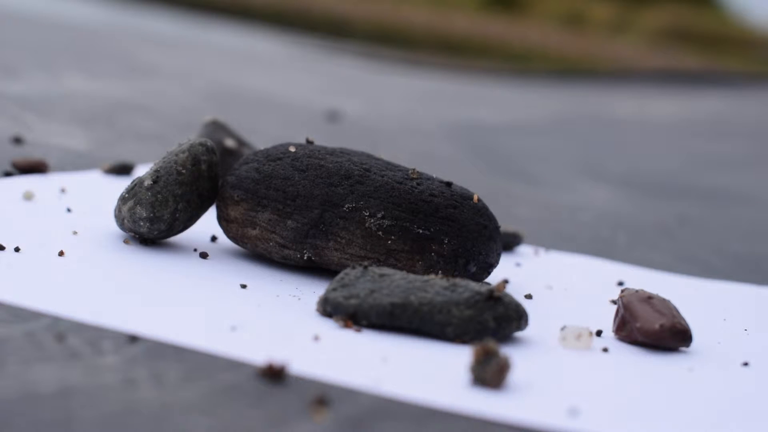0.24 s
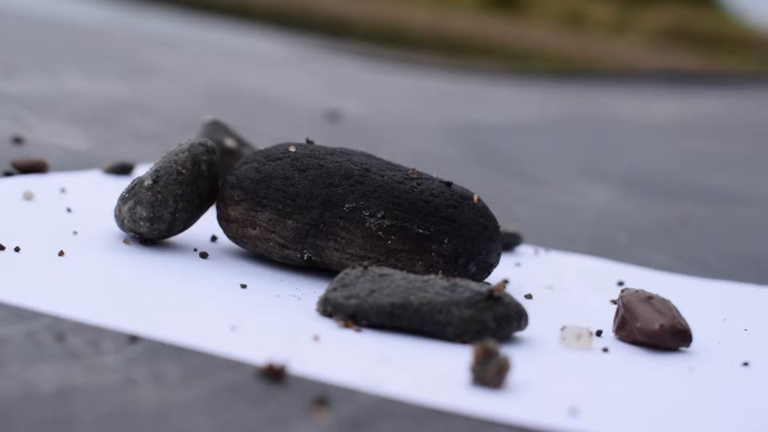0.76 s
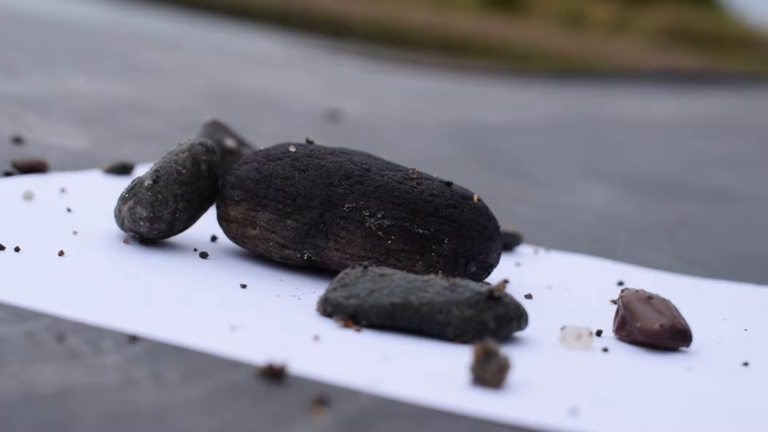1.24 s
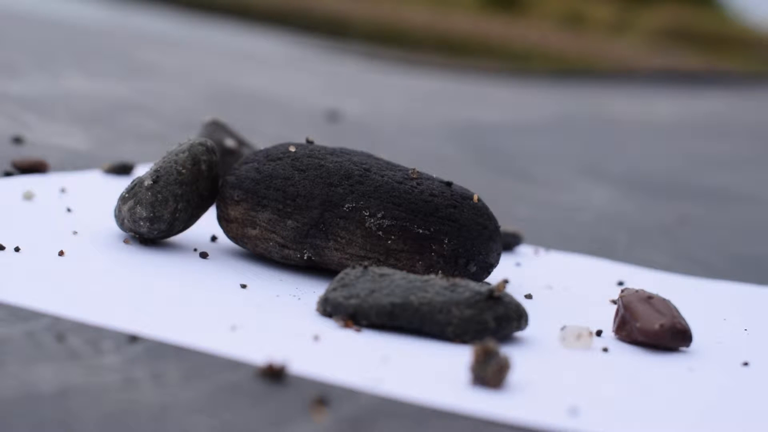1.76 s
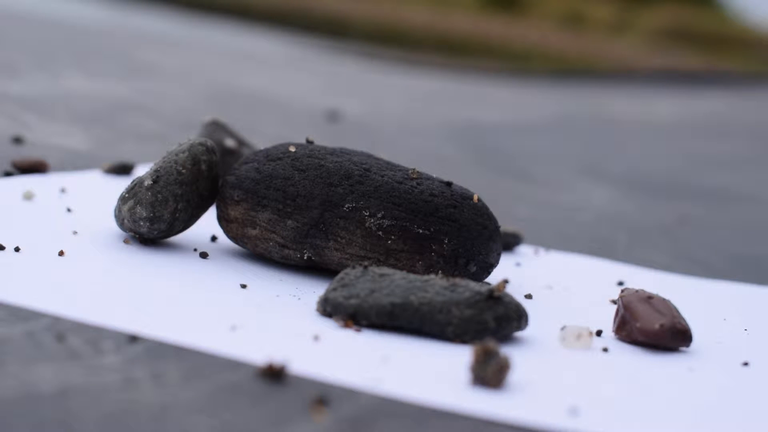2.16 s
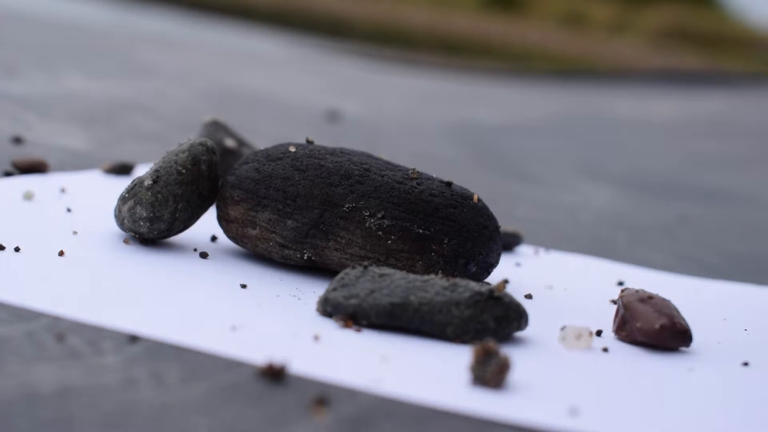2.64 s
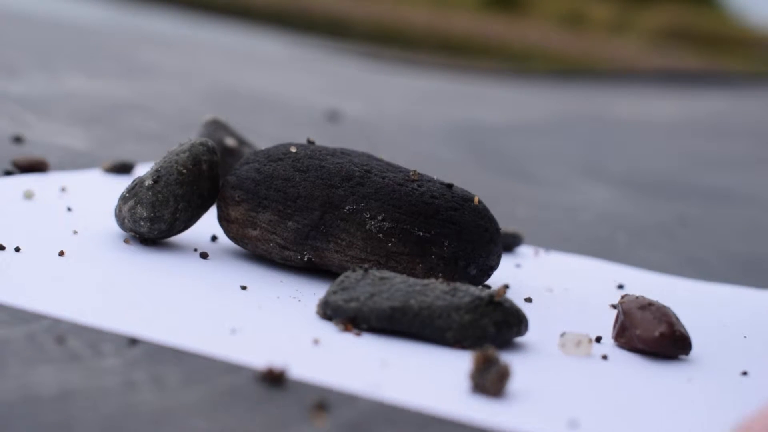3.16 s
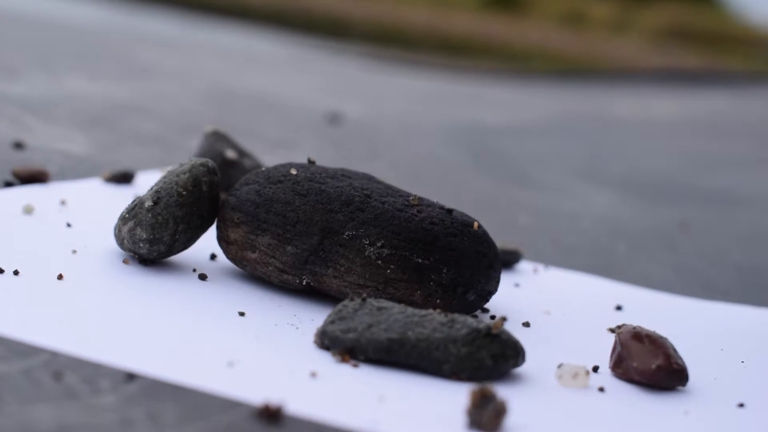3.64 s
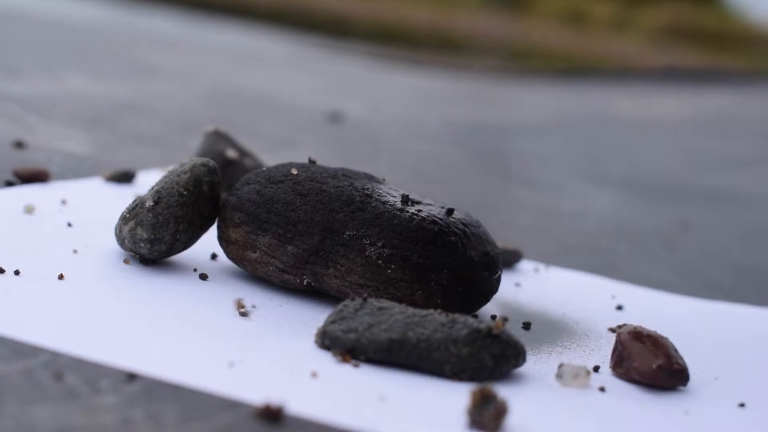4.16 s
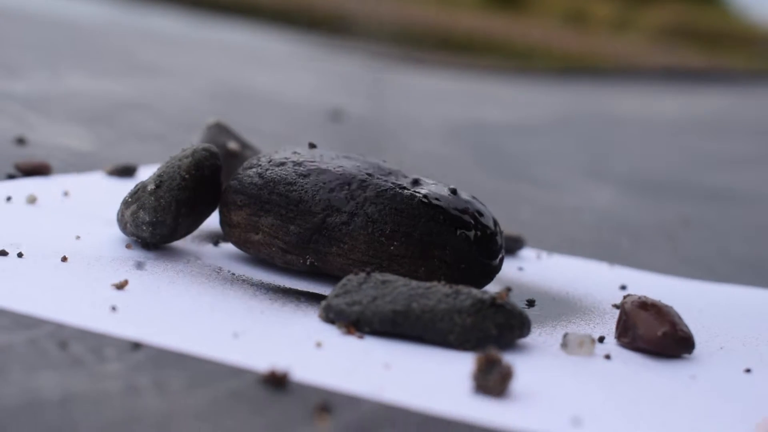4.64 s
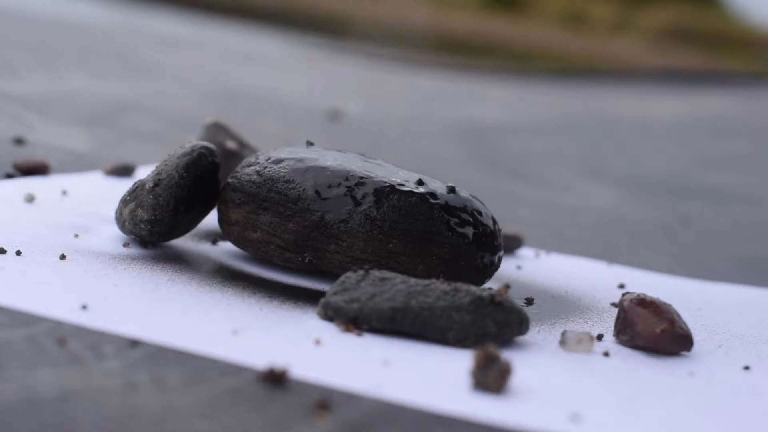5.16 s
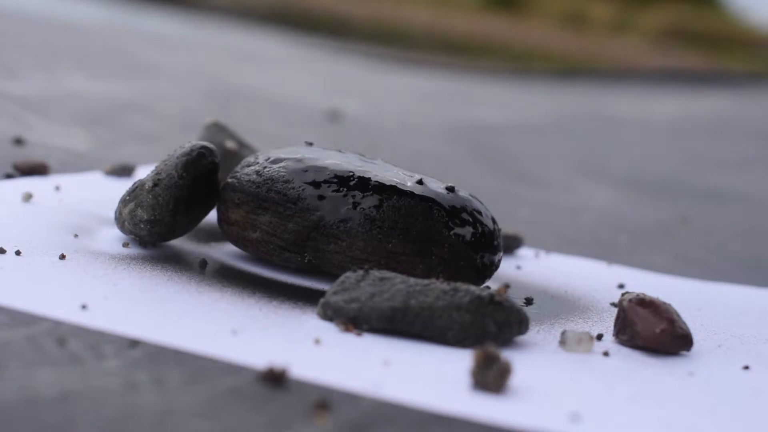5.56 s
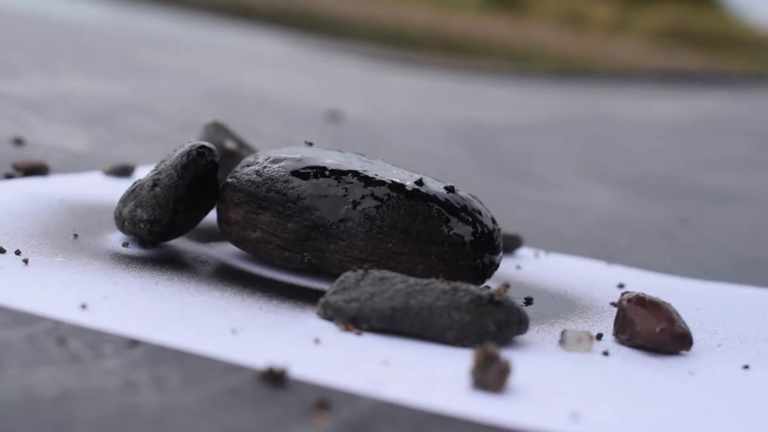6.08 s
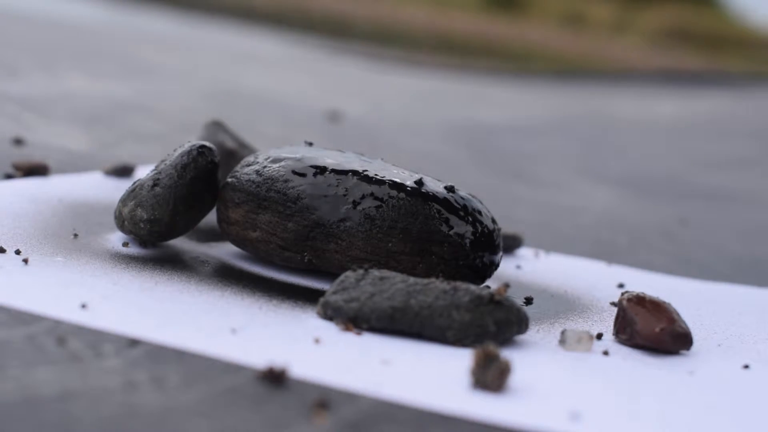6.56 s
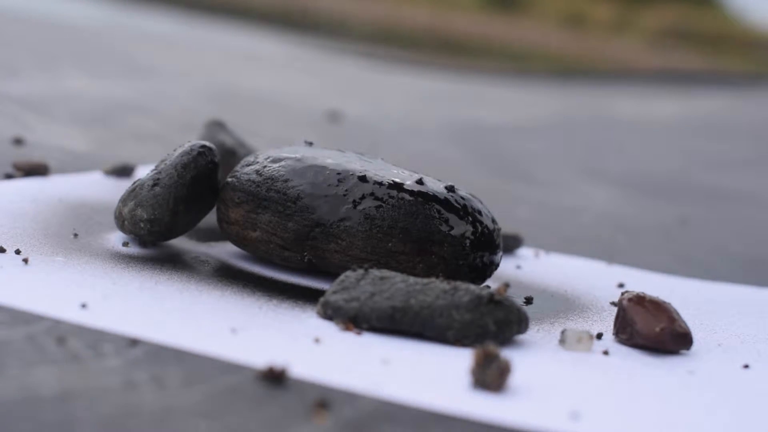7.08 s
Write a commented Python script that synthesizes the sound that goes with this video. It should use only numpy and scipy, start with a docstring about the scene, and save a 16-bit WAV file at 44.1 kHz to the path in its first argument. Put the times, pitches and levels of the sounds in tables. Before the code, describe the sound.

About twenty fast, loud clanks of a mixing ball in a metal can, alternating between brighter base hits and slightly weaker top hits, clipping the close microphone. After a last rattle comes over a second of near quiet: faint taps, a thin high whistle, soft background wash. A crisp spray hiss follows to the end, thinning and gently pulsing as the jet flicks back and forth, while the ball knocks dully in the paint. Dry open sound.

```python
"""A shaken spray paint can: impacts of the mixing ball excite decaying modes of wall and dome, each slam
followed by ever weaker rebounds and a skitter; the hard blows overload the input. After a pause the nozzle
hisses over some stones, jet noise whose spectrum follows the aim, and the ball, deep in paint, knocks more dully.
Churning paint and finger taps are shaped noise, a papery rustle is a run of tiny impacts, a thin whistle is
a gliding sine. A soft distant wash of filtered noise with a low murmur lies underneath."""
import sys
import numpy as np
from scipy import signal
from scipy.fft import rfft, irfft, next_fast_len
from scipy.io import wavfile
from scipy.ndimage import uniform_filter1d

SR = 44100
rng = np.random.default_rng(int(sys.argv[2]) if len(sys.argv) > 2 else 0)


def wav_record(signal):
    """Record a signal, one row per channel, as 16-bit PCM in the file named by sys.argv[1]."""
    frames = np.transpose(np.atleast_2d(signal))
    bounded = np.clip(frames, -1, 1)
    # unit amplitude maps onto the largest positive 16-bit level
    quanta = np.round(bounded * 32767).astype(np.int16)
    wavfile.write(sys.argv[1], SR, quanta)


N = 322371
TIME = np.arange(N) / SR
STEREO = np.array([[1], [-1]])  # sign of a difference signal at left and right

# outward strokes slam the ball into the base: start_s, peak_db, wall_hz, dome_hz, dome_db (against the wall),
# tick_db (against wall and dome), first_hop_s, chatter_gap_s, rebound_peak_db, skitter_db
OUT_STROKES = [(0.2315, 2, 1730, 3296, 3, 0.5, .0225, 0.0091, -12, -28.5),
               (0.4111, 11.5, 2185, 3297, 2, -20, .046, 0.0063, -3, -31),
               (0.6143, 12, 1910, 3093, -1, -11, 0.017, 0.015, 2, -24),
               (0.8164, 11.5, 1794, 3510, 5.5, -7, 0.013, 0.007, 6, -27),
               (1.0088, 11, 2200, 2870, 7, -1, 0.018, 0.0093, 3, -20.5),
               (1.192, 10.5, 2060, 2950, 10.5, -4, 0.014, 0.014, 2, -29),
               (1.3911, 10, 1945, 2755, -2, -3.5, .014, 0.0054, 1, -23.5),
               (1.5953, 13, 1690, 3183, 4, 1.5, .0117, 0.0098, 5.5, -26),
               (1.7693, 10, 2130, 3140, 11, -3, 0.012, 0.013, 3, -25.5),
               (1.9442, 10, 2278, 2713, 5, -3, 0.018, 0.0098, 5.5, -22),
               (2.1214, 12.5, 2276, 2767, 4.5, -6.5, 0.024, 0.015, -11.5, -55.5)]
# back strokes throw it against the top, with longer hops on the whole: start_s, peak_db, wall_hz, dome_hz,
# dome_db (against the wall), tick_db (against wall and dome), first_hop_s, chatter_gap_s, rebound_peak_db, skitter_db
BACK_STROKES = [(0.4959, 9.5, 1870, 2954, -4.5, -3, 0.055, 0.02, -14, -35),
                (0.7243, 9.1, 1860, 3430, -4.5, -1, 0.025, .0103, -1.5, -23.5),
                (0.8845, 10.2, 1940, 3315, -6.5, -9, 0.043, 0.014, -1, -47),
                (1.101, 6.3, 1567, 2810, -6.5, -6.5, 0.021, 0.011, -2, -40),
                (1.2829, 8.1, 1660, 2940, 3.5, -4, .035, .003, -2.5, -57),
                (1.4694, 7.5, 1570, 2890, -5, -10, 0.02, 0.021, -4, -30),
                (1.6653, 7.2, 1590, 2960, -10.5, -4, .0258, 0.011, -6.5, -33.5),
                (1.8362, 9.3, 1847, 2745, -4.5, -20, .024, 0.014, -0.5, -38.5),
                (2.0296, 8.6, 1577, 4750, -11.5, -10.5, 0.024, 0.013, -3.5, -47)]
# rebounds off base and top: centre of the wall pitch, loss times the bounce count squared, skitter length
BASE_WALL_HZ, BASE_LOSS_DB, BASE_SKITTER_S = 1876, 1.24, .065
TOP_WALL_HZ, TOP_LOSS_DB, TOP_SKITTER_S = 1470, 2.2, .04
# each chatter gap is about this share of the one before; a rebound is a glancing blow that stirs the dome less
GAP_SHARE, REBOUND_DOME_HZ, REBOUND_DOME_DB, REBOUND_TICK_DB = .88, 2975, -12.5, -10.5
SLIDE_S, SLIDE_DB = 0.024, -3.5  # slide along the wall just before the base; level against the skitter after
# the ball rolls along the wall, and at 4.88 s something rustles like paper:
# start_s, length_s, level_db, scrape_db (against the ring)
ROLLS_AND_RUSTLE = [(2.169, 0.091, -31, -18), (2.244, 0.1, -38, -22), (4.88, .093, -33.5, -2.5),
                    (5.659, 0.078, -40.5, -16)]
# modes of the can at rest, further damped in each sound: mode_hz, relative_db, t60_s
CAN_MODES = [(674, -19, 0.017), (1080, -0.5, 0.024), (1256, -6, 0.072), (1433, 1.5, 0.056),
             (1672, -5, 0.064), (1893, 2.5, 0.065), (2112, 0, 0.025), (2770, -20.5, 0.35),
             (2980, -15, 0.059), (3295, -11.5, 0.1), (4144, -8, 0.037), (4655, -21, 0.049),
             (5820, -21, 0.031), (6050, -20.5, 0.038), (7980, -28, 0.03), (9180, -37.5, .04),
             (11400, -30, 0.023)]
PAINT_T60_S, WET_CAN_T60_S = .07, .015  # extra damping of the can in a skitter, and in a knock under paint
# contact noise of dry steel: frequency_hz, relative_db
DRY_TICK = [(600, -19), (2500, -1.5), (4800, 1), (9500, -5), (12500, -11), (16000, -22)]
# contact noise of steel under paint: frequency_hz, relative_db
WET_TICK = [(600, -25), (1700, -9), (2600, -1.5), (3700, -6), (5200, -8), (9000, -12.5), (16000, -25)]
BEAM_DB_PER_OCTAVE = 7.5  # the higher the part of a tick, the more it differs between the ears
# steel scraping along the wall: frequency_hz, relative_db
SCRAPE = [(100, -42), (500, -35.5), (2500, -8), (4500, 10.5), (10000, 6), (13000, -12), (16000, -21.5)]
GRIT_DB = 5.5  # spread of the scrape level from spot to spot
# paint thrown up by a blow: frequency_hz, relative_db
SPLASH = [(1000, -24), (2400, 4.5), (3200, 3), (5500, -7), (7500, -8), (11000, -17), (15000, -24)]
# single knocks of the loose ball as the can turns or tilts: start_s, peak_db, wall_hz, dome_hz,
# dome_db (against the wall)
KNOCKS = [(0.2834, -8, 1950, 4520, 1), (1.268, -6, 1420, 3060, -10), (1.443, -8.5, 1830, 3070, -12),
          (2.174, -10.5, 1540, 3050, -7), (2.279, -12, 1520, 3750, -13), (2.29, -16.5, 1430, 3060, -15),
          (2.3981, -6, 2650, 2900, 0.5), (4.1156, -8, 2390, 3330, -6), (4.152, -19, 2050, 3300, -23),
          (4.6462, -10.5, 1740, 3330, 10), (5.073, -7.5, 2540, 3250, 4.5), (5.108, -11.5, 1770, 3410, 5),
          (5.4457, -4, 2440, 3140, 17), (5.4785, -13.5, 1640, 2550, -4), (5.507, -15, 1720, 3280, -17),
          (5.549, -24, 1700, 3000, -15), (5.604, -11.5, 1653, 2450, -24), (5.6278, -17, 1807, 4200, -12),
          (5.7953, -14, 1140, 3920, 6), (5.984, -10.5, 2470, 3640, 9), (6.4095, -14, 1070, 2960, 8),
          (6.4535, -19, 2060, 3100, 13), (6.5566, -13.5, 1320, 3320, 8), (6.65, -21.5, 2420, 2950, 7),
          (6.6862, -26, 2340, 3600, -3), (7.019, -16, 1100, 3130, 12), (7.0835, -13.5, 2360, 3030, -3),
          (7.1009, -13.5, 2140, 2660, -7), (7.1851, -11.5, 2210, 2610, -37), (7.214, -9.5, 2400, 3290, 16),
          (7.2819, -8, 2400, 3000, -2), (7.2932, -11.5, 2150, 4250, -6)]
KNOCK_TICK_DB, WET_TICK_DB = -14, -10.5  # contact tick of a dry knock, and of one under paint

# paint churning in the can while it is shaken, then settling: time_s, level_db
SLOSH_LEVEL = [(0, -61), (.2, -42), (.6, -39.5), (1.8, -44), (2.3, -46), (2.42, -46.5), (2.78, -53.5),
               (3.0, -87.5)]
# spectrum of the churning paint: frequency_hz, relative_db
SLOSH_COLOUR = [(200, -31), (750, -5.5), (1250, 5.5), (1900, -0.5), (2500, -3), (3300, -9.5), (6000, -14),
                (11000, -15.5), (15000, -36.5)]
CHURN_DB = 2.2  # unevenness of the churning
# fingers shift on the cap and the can: start_s, level_db (before decay), centre_hz,
# fall_db (two octaves below and one above the centre), t60_s
CAP_TICKS = [(2.51, -37, 2400, 9.5, 0.25), (3.432, -40.5, 3020, 14, .043), (3.509, -48.5, 4060, 14, 0.038),
             (3.84, -40, 7550, 12, 0.024), (5.366, -26, 1000, 43, 0.084), (6.125, -29.5, 810, 38, 0.058),
             (6.725, -31, 770, 41, 0.049)]

# the hand carries the jet from the middle of the stones to their edge: time_s, level_db, aim (0 middle, 1 edge)
JET = [(4.02, -32, 0.23), (4.2, -30, 0.31), (4.55, -31.5, 0.18), (4.8, -30.5, 0.044), (4.98, -35, .3),
       (5.35, -32.5, 0.58), (5.7, -35, 0.71), (5.98, -38.5, 0.9), (6.5, -41, .95), (6.85, -38.5, 0.78),
       (7.31, -39, 1)]
# hiss aimed at the middle, its dB scaled by 1.5 - aim: frequency_hz (before the hump moves), relative_db
HISS_MIDDLE = [(700, -31), (2100, -13), (3400, -13), (3800, -9), (4400, -9), (5250, -12.5), (5750, -12.5),
               (6800, -13.5), (8500, -9.5), (10000, -15.5), (10900, -14.5), (12100, -11), (14000, -20),
               (16000, -27)]
# hiss aimed at the edge, its dB scaled by aim: frequency_hz (before the hump moves), relative_db
HISS_EDGE = [(700, -48), (1920, -7.5), (3260, -12), (4320, -6), (5180, -5), (6200, -11), (7500, -8.5),
             (9100, -2.5), (10200, 3), (11200, -7), (12050, -7.5), (13450, -4), (16000, -7)]
MIDDLE_HZ, EDGE_HZ = 8700, 8840  # main hump of each
# narrow peaks and dips that stay put in the hiss: centre_hz, width_hz, gain_db
HISS_RIPPLE = [(2660, 300, 3), (2950, 190, 0.5), (3440, 150, 5), (5370, 180, 4.5), (5730, 290, -3.5),
               (11400, 410, -2)]
# the lower hiss, made where the jet strikes the stones, at the middle and at the edge
STRIKE_MIDDLE_DB, STRIKE_EDGE_DB = -7.5, -0.65
COMB_DEPTH = .25  # strength of the reflection off the table
# hiss scattered from all around: frequency_hz, relative_db
SCATTER = [(2500, -56), (4000, -30), (5600, -1.5), (8000, -13.5), (10500, 0), (13500, -6), (16000, -3.5)]
SCATTER_DB = -46
VALVE_OPEN_S, VALVE_RISE_S = 4.013, .06
JET_FLUTTER_DB, HAND_TREMOR_DB = .25, 1  # fast flutter, and the slower waver of the unsteady hand
# moments at which the flicked jet crosses the stones: time_s
PASSES = [5.4, 5.6, 5.8, 6.04, 6.26, 6.49, 6.73, 6.9, 7.11, 7.31]
# each pass swells the hiss and, a little earlier, lifts its pitch; the flicks widen over the first passes
PASS_SWELL_DB, PASS_BEND, PASS_LEAD_S, PASS_GROW_S = 3, 0.047, 0.04, 1

# a faint thin whistle, before its wavering: time_s, pitch_hz, level_db
WHISTLE = [(2.98, 11000, -100), (3.06, 11150, -70.5), (3.35, 10900, -72), (3.42, 9540, -71),
           (3.52, 9500, -68), (3.58, 9300, -100)]
# spectrum of the distant wash: frequency_hz, relative_db
WASH = [(30, -27.5), (80, -15.5), (160, -9.5), (300, -9), (500, -4.5), (780, 0), (1050, 1), (1500, -4),
        (2050, -13), (2800, -16.5), (3600, -20), (6500, -32.5), (11000, -34), (15000, -46)]
# the part of the wash that differs between the ears: frequency_hz, relative_db
WASH_SIDE = [(30, 5), (200, -10.5), (400, -8.5), (800, 2), (1300, -8.5), (3000, -11), (9000, -2.5),
             (15000, -28)]
# spectrum of the low murmur: frequency_hz, relative_db
MURMUR = [(40, -24), (100, -10.5), (180, -1.5), (400, -7), (800, -3.5), (1500, -39.5)]
# levels of the background: time_s, wash_db, murmur_db
WASH_LEVEL = [(0, -45.5, -76), (3.0, -45, -57.5), (5.4, -41, -54.5), (6.45, -44, -47.5),
              (7.31, -38.5, -52.5)]
WASH_SWAY_DB = .6
TOP_HZ = 15850  # upper band edge of the input


def ball_and_rustle():
    """Repeated impact and rolling contact of the ball; a like run of tiny impacts gives a papery rustle."""
    out = strokes(OUT_STROKES, BASE_WALL_HZ, BASE_LOSS_DB, BASE_SKITTER_S, scrape_db=-10)
    out += strokes(BACK_STROKES, TOP_WALL_HZ, TOP_LOSS_DB, TOP_SKITTER_S, scrape_db=-24.5)
    # it is flung along the wall only in full swing: not on the first three outward strokes, nor the last
    for start_s, *_, skitter_db in OUT_STROKES[3:-1]:
        slide = skitter(SLIDE_S, scrape_db=-11.5, drop_db=1)
        add(out, start_s - SLIDE_S, undb(skitter_db + SLIDE_DB) * slide)
    for start_s, length_s, level_db, scrape_db in ROLLS_AND_RUSTLE:
        add(out, start_s, undb(level_db) * skitter(length_s, scrape_db))
    return out


def strokes(table, rebound_hz, loss_db, skitter_s, scrape_db, splash_db=-21.0, splash_limit_db=-15,
            detune=0.087, scatter_db=2, gap_scatter=0.097, count=4):
    """Inelastic bouncing: a slam throws up paint, then come a hop, ever weaker rebounds and a skitter."""
    out = np.zeros((2, N))
    for (start_s, peak_db, wall_hz, dome_hz, dome_db, tick_db,
         hop_s, gap_s, rebound_db, skitter_db) in table:
        add(out, start_s, undb(peak_db) * blow(wall_hz, dome_hz, dome_db, tick_db, DRY_TICK))
        thrown_db = min(peak_db + dome_db + splash_db, splash_limit_db)
        add(out, start_s, undb(thrown_db) * splash())
        lands_s = start_s + hop_s
        add(out, lands_s, undb(skitter_db) * skitter(skitter_s, scrape_db))
        for k, (pitch, strength, angle, flight) in enumerate(rng.standard_normal((count, 4))):
            glance_db = 3 * angle
            rebound = blow(rebound_hz * (1 + detune * pitch), REBOUND_DOME_HZ,
                           REBOUND_DOME_DB + glance_db, REBOUND_TICK_DB + glance_db, DRY_TICK,
                           wall_t60=0.015, can_db=-5.5, can_t60=0.042, tick_t60=0.0058)
            level_db = rebound_db - k ** 2 * loss_db + scatter_db * strength
            add(out, lands_s, undb(level_db) * rebound)
            lands_s += gap_s * GAP_SHARE ** k * np.exp(gap_scatter * flight)
    return out


def blow(wall_hz, dome_hz, dome_db, tick_db, tick_colour, wall_t60=0.012, dome_t60=0.012, tick_t60=0.0093,
         can_db=-5, can_t60=0.055, clink_db=-9, contact_s=0.00067, tick_rise_s=0.00034, tick_width=0.31,
         dome_width=0.071):
    """Modal excitation by impact: wall and domed end ring briefly with a bright contact tick; peak 1."""
    t = TIME[:2048]
    beamed = [(hz, db + BEAM_DB_PER_OCTAVE * np.log2(hz)) for hz, db in tick_colour]
    contact = noise(tick_colour, size=len(t)) + STEREO * tick_width * noise(beamed, size=len(t))
    clink = cluster(t, 8600, 0.0022, spread=0.16, neighbours_db=11.5)
    tick = unit(contact * fade(t, tick_t60)) + undb(clink_db) * clink

    can = unit(can_ring(t) * fade(t, can_t60))
    wall = unit(cluster(t, wall_hz, wall_t60) + undb(can_db) * can)
    dome, dome_side = (cluster(t, dome_hz, dome_t60, spread=0.151, neighbours_db=2.0, count=12)
                       for _ in range(2))
    body = unit(wall + undb(dome_db) * (dome + STEREO * dome_width * dome_side))

    # the finite contact time softens each onset
    hit = body * (1 - np.exp(-t / contact_s))
    hit = hit + undb(tick_db) * tick * (1 - np.exp(-t / tick_rise_s))
    return -hit / np.abs(hit).max()


def can_ring(t, detune=0.033, spread_db=8.0, width=0.5):
    """Modal superposition: the moving paint detunes the can's modes and each spot weights them anew."""
    hz, db, t60 = np.transpose(CAN_MODES)[:, :, None]
    shift, weight, sign, side = rng.standard_normal((4, len(CAN_MODES), 1))
    gain = np.sign(sign) * undb(db + spread_db * weight)
    modes = gain * ring(t, hz * (1 + detune * shift), t60)
    # high modes beam, so they differ more between the ears
    beaming = np.minimum(hz / 4000, 1) ** 2
    return modes.sum(0) + STEREO * width * (modes * side * beaming).sum(0)


def cluster(t, hz, t60, spread=0.062, neighbours_db=-8, count=6):
    """Beating: a shell mode sounds together with close neighbours in frequency."""
    shift, weight = rng.standard_normal((2, count, 1))
    neighbours = (weight * ring(t, hz * np.exp(spread * shift), t60)).sum(0)
    return unit(unit(ring(t, hz, t60)) + undb(neighbours_db) * unit(neighbours))


def skitter(length_s, scrape_db, drop_db=11, rate=700, spread_db=4, count=8):
    """Impulse trains convolved with spot responses: a run of tiny impacts dies away on a few spots."""
    t, size = TIME[:2048], int(length_s * SR)
    bounces = int(length_s * rate / count) + 1  # on each spot
    run = 0
    for _ in range(count):
        scrape = unit(noise(SCRAPE, size=len(t)) * fade(t, 0.0061))
        spot_ring = unit(can_ring(t, detune=0.022, width=.25) * fade(t, PAINT_T60_S))
        spot = spot_ring + undb(scrape_db + GRIT_DB * rng.standard_normal()) * scrape
        place = (np.arange(bounces) + rng.random(bounces)) / bounces  # 0 to 1 along the run
        pushes = np.zeros((1, size))
        pushes[0, (place * size).astype(int)] = undb(spread_db * rng.standard_normal(bounces) - drop_db * place)
        run = run + signal.fftconvolve(spot, pushes, axes=1)
    return run / np.sqrt(np.sum(run ** 2) / (2 * size))  # rms 1 over the nominal length


def splash(t60=0.049, rise_s=0.0046, width=.4):
    """Decaying broadband noise: a short fizzing spatter of paint against the wall."""
    t = TIME[:4096]
    spatter = noise(SPLASH, size=len(t)) + STEREO * width * noise(SPLASH, size=len(t))
    return spatter * fade(t, t60) * (1 - np.exp(-t / rise_s))


def knocks():
    """Impact with fluid damping: during spraying the ball lies deep in paint, so knocks are duller."""
    out = np.zeros((2, N))
    for start_s, peak_db, wall_hz, dome_hz, dome_db in KNOCKS:
        if start_s < VALVE_OPEN_S:
            knock = blow(wall_hz, dome_hz, dome_db, KNOCK_TICK_DB, DRY_TICK)
        else:
            knock = blow(wall_hz, dome_hz, dome_db, WET_TICK_DB, WET_TICK, wall_t60=0.0057, dome_t60=0.0078,
                         tick_t60=0.023, can_db=-2.5, can_t60=WET_CAN_T60_S, clink_db=-40,
                         contact_s=0.00097, tick_width=0.062)
        add(out, start_s, undb(peak_db) * knock)
    return out


def surroundings(x, t60=0.15, wet_db=-27):
    """Reverberation by convolution: nearby surfaces return a weak, short tail."""
    t = TIME[:16384]
    points = [(200, -7.5), (1500, 2.5), (5000, -28), (15000, 6.0)]  # frequency_hz, relative_db
    tail = np.array([noise(points, size=len(t)) for _ in range(2)])
    tail = tail * fade(t, t60) * (1 - fade(t, 0.033))
    tail = (tail[0] + STEREO * .4 * tail[1]) / np.sqrt(np.sum(tail[0] ** 2))
    return x + undb(wet_db) * signal.fftconvolve(x, tail, axes=1)[:, :N]


def slosh(width=.13):
    """Turbulent flow noise: paint churns unevenly inside the can and settles after the last shake."""
    churn = undb(curve(SLOSH_LEVEL) + CHURN_DB * walk(130))
    return churn * (noise(SLOSH_COLOUR) + STEREO * width * noise(SLOSH_COLOUR))


def cap(rise_share=0.013):
    """Friction and soft contact as decaying band noise: ticks, rubs and dull taps under the fingers."""
    out, t = np.zeros(N), TIME[:8192]
    for start_s, level_db, hz, fall_db, t60 in CAP_TICKS:
        band = [(hz / 4, -fall_db), (hz, 0), (hz * 2, -fall_db), (hz * 6, -3 * fall_db)]
        tap = noise(band, size=len(t)) * fade(t, t60) * (1 - np.exp(-t / (rise_share * t60)))
        add(out, start_s, undb(level_db) * tap)
    return out


def spray(echo_s=0.00123, comb_drift=0.042, size=512):
    """Turbulent jet noise: its humps move with aim and wrist, a reflection combs it, scatter widens it."""
    hz, t, frames = signal.stft(rng.standard_normal(N), SR, nperseg=size)
    hz, aim = hz[:, None], curve(JET, t, axis=2)
    hump_hz = (MIDDLE_HZ + aim * (EDGE_HZ - MIDDLE_HZ)) * (1 + PASS_BEND * wrist(t + PASS_LEAD_S))
    middle_db = (1.5 - aim) * colour(HISS_MIDDLE, hz * MIDDLE_HZ / hump_hz)
    edge_db = aim * colour(HISS_EDGE, hz * EDGE_HZ / hump_hz)
    shape = undb(middle_db + edge_db)

    # the reflection off the table combs the hiss; the comb drifts as the hand moves
    lag_s = echo_s * MIDDLE_HZ / hump_hz * (1 + comb_drift * np.interp(t, TIME, walk(4)))
    shape = shape * np.abs(1 + COMB_DEPTH * np.exp(-2j * np.pi * hz * lag_s))
    ripple_db = sum(db * np.exp(-((hz - centre) / width) ** 2) for centre, width, db in HISS_RIPPLE)
    shape = shape * undb(ripple_db)
    # the treble alone sets the level
    treble = (hz > 7000) & (hz < 15000)
    shape = shape / np.sqrt(np.mean(treble * shape ** 2, axis=0))
    # the lower hiss grows where the jet strikes the stones
    strike_db = STRIKE_MIDDLE_DB + aim * (STRIKE_EDGE_DB - STRIKE_MIDDLE_DB)
    strike_db = strike_db * np.interp(hz, [5500, 6800], [1, 0])

    jet = signal.istft(frames * shape * undb(strike_db), SR, nperseg=size)[1][:N]
    jet = jet * undb(curve(JET) + PASS_SWELL_DB * wrist(TIME))
    scattered = STEREO * noise(SCATTER) * undb(SCATTER_DB)
    valve = np.clip((TIME - VALVE_OPEN_S) / VALVE_RISE_S, 0, 1)  # the valve opens as the cap goes down
    waver = undb(JET_FLUTTER_DB * walk(60) + HAND_TREMOR_DB * walk(16))
    return valve * waver * (jet + scattered)


def wrist(t):
    """Oscillation of growing width: towards +1 as the jet crosses the stones, -1 at the turns, 0 before."""
    turns = np.interp(t, PASSES, np.arange(len(PASSES)))
    return np.clip((t - PASSES[0]) / PASS_GROW_S, 0, 1) * np.cos(2 * np.pi * turns)


def whistle():
    """Phase as the integral of frequency: a thin wavering tone comes and goes as it slides down."""
    hz = curve(WHISTLE) * (1 + .015 * walk(40) + .012 * walk(600))
    return np.sin(2 * np.pi * np.cumsum(hz) / SR) * undb(curve(WHISTLE, axis=2) + 5 * walk(36))


def wash(side_db=-20):
    """Interaural coherence: a swaying distant noise, nearly the same in both ears, with a low murmur."""
    murmur = noise(MURMUR) * undb(curve(WASH_LEVEL, axis=2))
    distant = noise(WASH) + STEREO * undb(side_db) * noise(WASH_SIDE)
    return distant * undb(curve(WASH_LEVEL) + WASH_SWAY_DB * walk(19)) + murmur


def undb(db):
    """Logarithmic level: decibels to amplitude gain."""
    return 10 ** (np.asarray(db) / 20)


def unit(x):
    """Normalization: scale to rms 1."""
    return x / np.sqrt(np.mean(x ** 2))


def curve(rows, t=TIME, axis=1):
    """Linear interpolation: one column of a table at times t."""
    rows = np.array(rows)
    return np.interp(t, rows[:, 0], rows[:, axis])


def colour(points, hz):
    """Spectral envelope: dB at the given frequencies, interpolated over log frequency."""
    points = np.array(points)
    return np.interp(np.log(hz + 1), np.log(points[:, 0]), points[:, 1])


def noise(points, size=N):
    """Spectral shaping: white noise weighted to the given spectrum, rms 1."""
    n = next_fast_len(size, real=True)
    spectrum = rfft(rng.standard_normal(n)) * undb(colour(points, np.fft.rfftfreq(n, 1 / SR)))
    return unit(irfft(spectrum, n)[:size])


def walk(rate):
    """Low-pass randomness: held random steps, averaged twice into a smooth wandering of rms 1."""
    k = int(SR / rate)
    steps = np.repeat(rng.standard_normal(N // k + 1), k)
    return unit(uniform_filter1d(uniform_filter1d(steps, k), k)[:N])


def add(out, start_s, sound):
    """Superposition: mix a sound in at its start."""
    i = int(start_s * SR)
    out[..., i:i + sound.shape[-1]] += sound[..., :N - i]


def fade(t, t60):
    """Exponential decay by 60 dB in t60 seconds."""
    return np.exp(-np.log(1000) * t / t60)


def ring(t, hz, t60):
    """Damped oscillation: one struck mode."""
    return np.sin(2 * np.pi * hz * t) * fade(t, t60)


def scene(left_db=0.55):
    """Superposition of sources: the rattle close by, a little to the left, over the distant wash."""
    rattle = surroundings(ball_and_rustle() + knocks()) * undb(STEREO * left_db / 2)
    return rattle + slosh() + cap() + spray() + whistle() + wash()


def record(dry):
    """Saturation and band limiting: the input clips hard blows, sits slightly off zero and cuts the top."""
    clipped = np.clip(dry, -1, 1) - .003
    return signal.sosfilt(signal.ellip(8, .2, 70, TOP_HZ, fs=SR, output="sos"), clipped)


dry = scene()
out = record(dry)
wav_record(out)
```